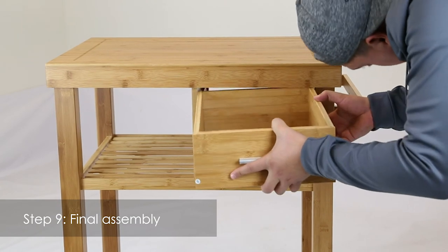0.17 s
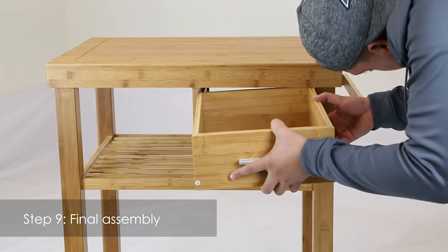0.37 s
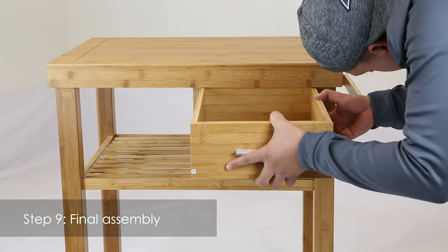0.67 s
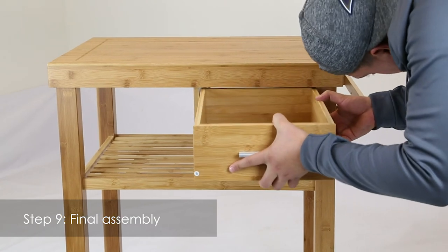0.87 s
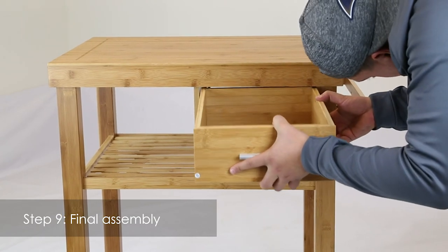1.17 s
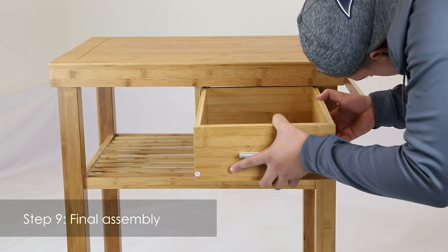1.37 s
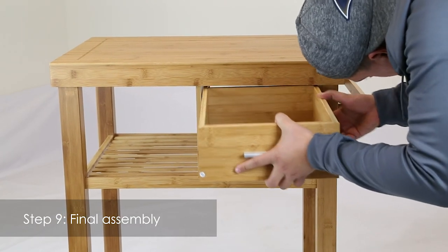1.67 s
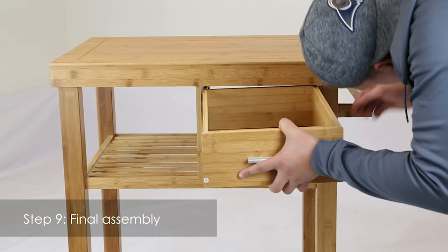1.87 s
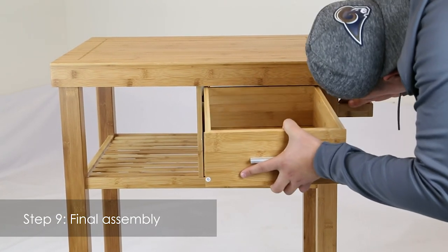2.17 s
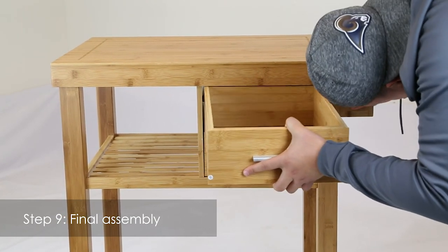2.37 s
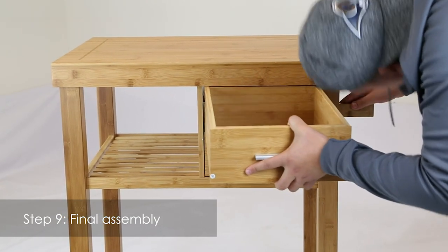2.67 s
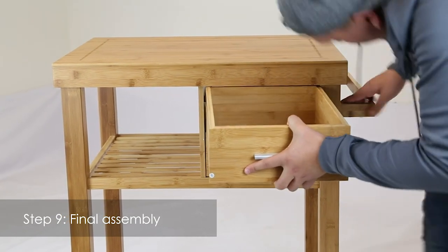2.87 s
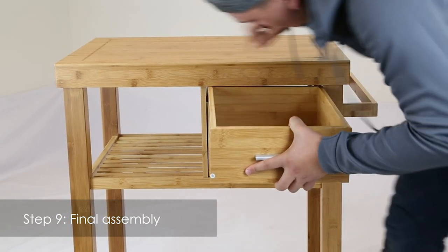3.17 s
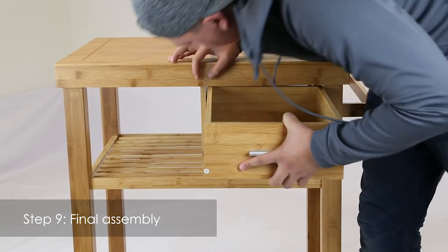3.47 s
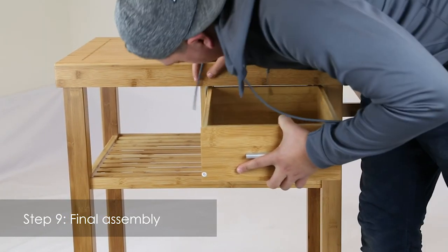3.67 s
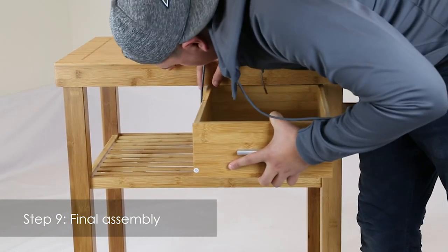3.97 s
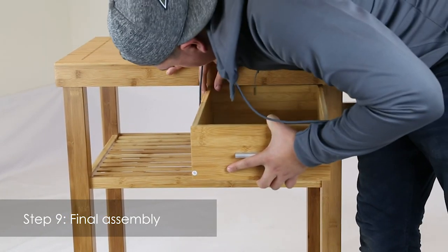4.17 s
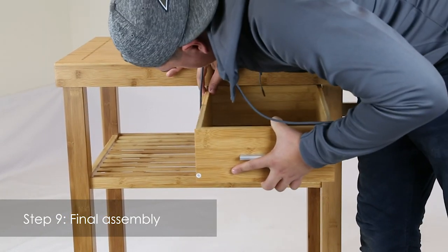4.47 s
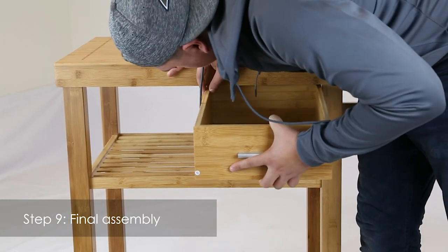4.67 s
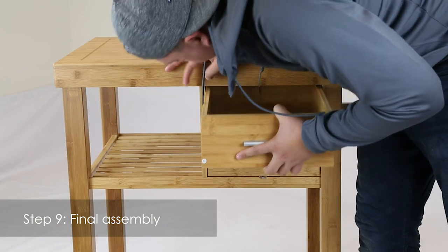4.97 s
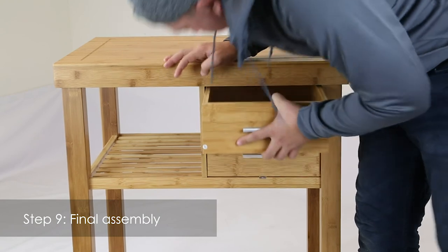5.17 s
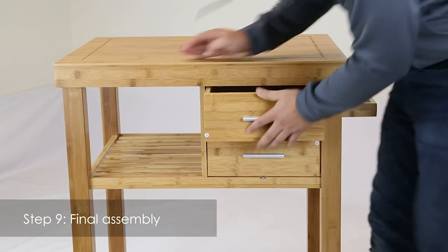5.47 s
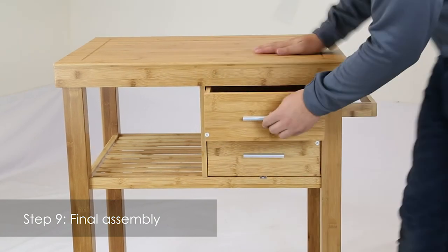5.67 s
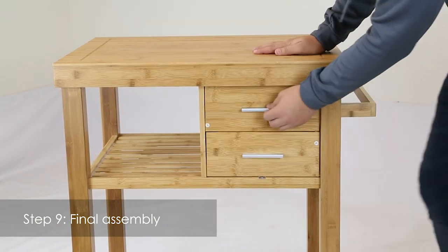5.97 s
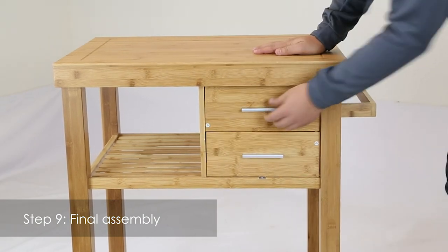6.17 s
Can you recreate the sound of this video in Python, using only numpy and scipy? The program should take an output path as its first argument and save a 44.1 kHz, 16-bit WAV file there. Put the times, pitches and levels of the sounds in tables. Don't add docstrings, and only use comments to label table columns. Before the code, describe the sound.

In a bare, reverberant room, a hollow wooden drawer is worked into a wooden cart. Irregular knocks come first, one strong, then short gritty scrapes with sharp ticks and dull leg thuds on the floor. After a quieter pause of fumbling, longer rough strokes carry it inward until a loud, overloaded slam closes it, followed by a small settling scrape. The microphone is near, with faint low air noise.

```python
import sys
import numpy as np
from scipy import signal
from scipy.fft import rfft, irfft, next_fast_len
from scipy.io import wavfile
from scipy.ndimage import uniform_filter1d

SR = 44100
rng = np.random.default_rng(int(sys.argv[2]) if len(sys.argv) > 2 else 0)


def decibels_to_gain(level_db):
    exponent = np.asarray(level_db, float) / 20
    return 10 ** exponent


def log_audio(samples):
    frames = np.atleast_2d(samples).T
    limited = np.clip(frames, -1, 1)
    pcm = np.round(limited * 32767).astype(np.int16)
    wavfile.write(sys.argv[1], SR, pcm)


N = 279594


def evened(x):
    return x / np.sqrt(np.mean(x ** 2) + 1e-20)


def read(points, hz):
    f, value = np.transpose(points)
    return np.interp(np.log(hz + 1), np.log(f + 1), value)


def add(mix, s, sound):
    part = mix[round(s * SR):][:len(sound)]
    part += sound[:len(part)]


def coloured(x, spectrum):
    gain = decibels_to_gain(read(spectrum, np.fft.rfftfreq(len(x), 1 / SR)))
    return evened(irfft(rfft(x) * gain, len(x)))


def filtered(x, response):
    size = next_fast_len(N + 4096)
    gain = decibels_to_gain(read(response, np.fft.rfftfreq(size, 1 / SR)))
    return irfft(rfft(x, size) * gain, size)[:N]


def causal(gain_db):
    log_gain = np.log(decibels_to_gain(np.maximum(gain_db, -80)))
    full = np.concatenate([log_gain, log_gain[-2:0:-1]])
    click = np.fft.ifft(np.exp(np.conj(signal.hilbert(full)))).real[:1024]
    return click / abs(click).max()


def chatter(t, t60):
    rise_s = 0.005
    shape = decibels_to_gain(-60 * t / t60) * (1 - np.exp(-t / rise_s))
    x = rng.standard_normal(len(t)) * shape
    for _ in range(3):
        z = rfft(x)
        x = irfft(z / abs(z), len(t)) * np.sqrt(shape)
    return x / np.linalg.norm(x)


def ring(modes, t, luck, rise_s, extra_db=0):
    hz, db, t60 = np.transpose(modes)[:, :, None]
    pitch_luck, level_luck = luck[:2 * len(modes)].reshape(2, -1, 1)
    waves = np.sin(2 * np.pi * hz * (1 + 0.0098 * pitch_luck) * t) * np.sign(level_luck)
    decay = decibels_to_gain(db + extra_db + 2.3 * level_luck - 60 * t / t60)
    sound = (decay * waves).sum(0) * (1 - np.exp(-t / rise_s)) ** 2
    return sound / abs(sound).max()


# frequency in Hz, density in dB per Hz.
AIR_SPECTRUM = [(12, -66), (20, -51), (44, -7.5), (66, -7), (95, -16), (167, -7), (192, -9), (284, -5.5),
                (524, -20.5), (586, -17), (693, -20), (2180, -27), (8090, -34), (15800, -38.5)]


def air():
    level_db = -55
    swell_db = 1.5 * evened(uniform_filter1d(rng.standard_normal(N), 6000))
    return decibels_to_gain(level_db + swell_db) * coloured(rng.standard_normal(N), AIR_SPECTRUM)


# frequency in Hz, t60 in seconds.
ROOM_DECAY = [(100, 0.56), (250, 0.51), (600, 0.4), (2000, 0.36), (6000, 0.37), (12000, 0.22)]


def room(x):
    taps = np.zeros((3, SR))
    at = np.arange(200, SR - 20, 20) + rng.integers(0, 20, (3, (SR - 201) // 20))
    np.put_along_axis(taps, at, rng.choice([-1., 1.], at.shape), 1)
    hz, t, z = signal.stft(taps, SR, nperseg=256)
    build = 1 - np.exp(-t / 0.0027)
    decay = decibels_to_gain(-60 * t / read(ROOM_DECAY, hz)[:, None])
    tails = signal.istft(z * build * decay, SR, nperseg=256)[1]
    turn = np.pi * 1.3 * np.arange(N) / SR + np.pi / 3 * np.arange(3)[:, None]
    fed = x * np.cos(turn) * np.sqrt(2 / 3)
    tails = tails[:, :SR * 2 // 3] / np.linalg.norm(tails[0])
    return signal.fftconvolve(fed, tails, axes=1)[:, :N].sum(0)


# start in seconds, level in dB, pitch in Hz.
LEG_THUDS = [
    (1.33, -43, 112.6),
    (1.771, -48, 98.3),
    (2.72, -41, 100),
    (2.963, -37.5, 110),
    (3.071, -29, 161),
    (3.74, -44, 109),
    (4.601, -46.5, 129),
    (5.21, -38.5, 126),
    (5.546, -34, 126),
]


def thuds():
    out, t = np.zeros(N), np.arange(4096) / SR
    rise_s, t60 = 0.01, 0.11
    for s, db, hz in LEG_THUDS:
        modes = [(hz, 0, t60), (hz * 1.475, -6, t60)]
        add(out, s, decibels_to_gain(db) * ring(modes, t, np.ones(4), rise_s))
    return out


# frequency in Hz, level in dB, t60 in seconds.
FRAME_MODES = [(142.4, -11, 0.058), (171, -13.5, 0.083), (192.2, -3, 0.081), (221.6, -4.5, 0.14),
               (239.4, 0.5, 0.052)]
BOX_MODES = [(273.6, 3.5, 0.063), (312.6, 1, 0.053), (329.5, -2, 0.058), (339.7, -4.5, 0.031),
             (357.7, 2.5, 0.037), (411.6, 3.5, 0.05)]
PANEL_MODES = [(486.7, -6, 0.074), (504.3, -2, 0.052), (580.5, -12.5, 0.074), (678.4, -3, 0.031),
               (706.5, -2.5, 0.028), (783.5, -5, 0.029), (914, -7, 0.026)]
# frequency in Hz, density in dB per Hz.
GRIT_SPECTRUM = [(410, -19), (700, -2.5), (1190, -7), (1770, -3.5), (1960, -5), (7610, -26), (11100, -35.5),
                 (15800, -47)]
# time in seconds, speed as grit level in dB.
STROKES = [
    [(1.66, -63.5), (1.784, -50.5), (1.9, -104)],
    [(3.12, -56), (3.162, -55.5), (3.34, -61), (3.36, -53), (3.406, -65.5), (3.6, -60.5)],
    [(4.2, -95), (4.45, -61.5), (4.6, -63), (4.7, -51.5), (4.8, -63)],
    [(4.78, -57), (4.884, -41), (4.96, -41), (5.06, -53), (5.14, -43), (5.222, -42), (5.49, -44),
     (5.545, -44)],
    [(5.6, -49), (5.7, -55), (5.782, -41.5), (5.86, -42.5), (5.95, -39.5)],
    [(6.16, -49.5), (6.294, -61), (6.338, -56)],
]


def slide(rows):
    s, grit_db = np.transpose(rows)
    speed_db = grit_db + 45
    fizz_db = -11.5 + 0.98 * speed_db
    rumble_db = -1 - 0.49 * speed_db
    t = np.arange(s[0], s[-1], 1 / SR)
    slips = rng.standard_normal((2, len(t))) * decibels_to_gain(0.93 * rng.exponential(1, (2, len(t))))
    slips *= rng.random((2, len(t))) < np.array([[20000], [300]]) / SR
    judder_db = 0.53 * evened(uniform_filter1d(rng.standard_normal(len(t)), 700))
    modes = FRAME_MODES + BOX_MODES + PANEL_MODES
    body = ring(modes, np.arange(8192) / SR, rng.standard_normal(64), 0.00037)
    rumble = evened(signal.fftconvolve(slips[1], body)[:len(t)])
    grit = coloured(slips[0], GRIT_SPECTRUM)
    fizz = evened(np.convolve(grit, [-1, 2, -1], "same"))
    sound = grit + decibels_to_gain(np.interp(t, s, fizz_db)) * fizz + decibels_to_gain(np.interp(t, s, rumble_db)) * rumble
    level = decibels_to_gain(np.interp(t, s, grit_db) + judder_db - 1.5)
    return s[0], sound * level * signal.windows.tukey(len(t), .08)


# start in seconds, level in dB, centre in Hz, spread in octaves.
HARD_TICKS = [(0.867, -34.5, 9900, 0.23), (1.6345, -41.5, 1960, 0.38), (2.978, -45, 8900, .8),
              (3.0703, -23.5, 3180, 0.89), (3.08, -30.5, 3900, 0.27), (3.174, -52, 2500, .6),
              (3.303, -42, 6000, 0.67), (3.358, -45, 4050, .6), (3.82, -20.5, 6570, .9),
              (4.955, -37, 4940, 1.2), (5.5034, -42, 10000, 0.37), (5.5557, -15, 3380, 0.95),
              (5.575, -24.5, 3020, 1.1), (5.59, -23, 3000, 1.1), (5.979, -19, 7260, 0.38),
              (0.873, -30, 3740, 0.93)]
# frequency in Hz, level in dB, t60 in seconds.
FITTING_MODES = [(3870, 4, 0.021), (3980, -3, 0.028), (6000, -14, .008), (7100, -7, 0.024),
                 (9100, -12, 0.014)]


def ticks():
    out, t, hz = np.zeros(N), np.arange(2048) / SR, np.fft.rfftfreq(2048, 1 / SR)
    for s, db, centre_hz, spread in HARD_TICKS:
        scuff = decibels_to_gain(0.5) * chatter(t, 0.023) + decibels_to_gain(-4) * (t == 0)
        octaves = np.log2((hz + 20) / centre_hz)
        snap = causal(-24 * np.log10(1 + (octaves / spread) ** 2))
        add(out, s - .0005, decibels_to_gain(db) * signal.fftconvolve(scuff, snap))
    clink_s, clink_db = 3.82, -32
    add(out, clink_s, decibels_to_gain(clink_db) * ring(FITTING_MODES, t, rng.standard_normal(10), 0.00028))
    return out


# frequency in Hz, density in dB per Hz.
EDGE_SPECTRUM = [(600, -41), (900, 2.5), (1170, -2.5), (1290, -6), (1500, 0), (1750, -5), (2000, -15.5),
                 (2250, -13), (2600, -11.5), (3200, -23.5), (4500, -53)]
CRACK_SPECTRUM = [(710, -27), (1200, -5.5), (1280, -6.5), (1640, -10), (1940, -5.5), (2860, -21.5),
                  (3430, -16), (15500, -51.5)]
# time in seconds, box note in Hz, panel note in Hz.
FAVOURED_NOTES = [(0, 346, 673), (.6, 323, 670), (3.0, 347, 747), (4.5, 316, 696), (5.1, 344, 724),
                  (5.18, 379, 598), (5.3, 379, 583), (5.42, 315, 710), (5.95, 333, 669)]
# start in seconds, box level in dB, weight into the frame in dB, hardness in dB.
SOFT_BUMPS = [(0.183, -31.5, -4, -10.5), (0.999, -26.5, -4.5, -9), (1.101, -35.5, -20, -16.5),
              (1.315, -30.5, -4, -21), (1.818, -65, -10, -22), (2.476, -28, 1, -20),
              (2.77, -27.5, -4.5, -15), (2.834, -37.5, -16, -2), (2.86, -33, -7, -5),
              (2.985, -21.5, -10.5, -10), (3.666, -38, -15, -11), (3.773, -31.5, 0, 1.5),
              (3.815, -37, -19.5, 6), (3.862, -24, -14, -20.5), (3.963, -29, -10.5, -11.5),
              (4.14, -42, -7.5, -17), (4.536, -30, -10, -11), (5.214, -22.5, -23, -27),
              (5.42, -26, -11, -7.5), (5.599, -27, -4, -6), (5.807, -24.5, -12, -9.5)]
# start in seconds,
# box level in dB, weight into the frame in dB, hardness in dB, share on the side panels in dB.
CLEAR_KNOCKS = [(0.074, -22.5, -6, -11.5, -5), (0.625, -25.5, -6, -8, -1.5), (0.857, -8, -13, -6, -6.5),
                (1.331, -27.5, -7, -8.5, 0.5), (1.38, -19.5, -13.5, -3.5, 2),
                (1.707, -33.5, -14, -9.5, -17), (1.76, -30, -8, -7.5, -7), (2.174, -26, -7.5, -4.5, 1),
                (2.313, -32, -2, -2, 6.5), (2.41, -22, -10.5, -2, 2.5), (2.665, -24.5, -13, -8, -1.5),
                (2.715, -18.5, -10, -9.5, -2), (2.963, -19.5, -19, -6.5, 1.5), (3.075, -35.5, -5, -3, 0.5),
                (3.252, -29.5, -8, -12.5, -4.5), (3.606, -20.5, -13, -17, -11), (3.737, -14, -13, -7, -4.5),
                (4.496, -26.5, -6.5, -12.5, -5), (4.803, -27.5, -9.5, -13, -7), (4.954, -28, -8.5, -1, -4),
                (5.175, -21.5, -9.5, -7.5, -0.5), (5.284, -19, -25, -8, -11.5),
                (5.552, -28.5, -1.5, 3, 5.5), (5.773, -23.5, -14, -36, -21)]
SLAM_STEPS = [
    (5.9576, -10.5, -12, -5, 2.5),
    (5.9636, -5, -5.5, -1.5, 4),
    (5.981, -6.5, -13, -3, -5),
    (5.999, -11.5, -1, -22, -15),
]


def knocks():
    out, t = np.zeros(N), np.arange(6144) / SR
    hz = np.fft.rfftfreq(2048, 1 / SR)
    box_hz = np.transpose(BOX_MODES)[0][:, None]
    panel_hz = np.transpose(PANEL_MODES)[0][:, None]
    when, box_notes, panel_notes = np.transpose(FAVOURED_NOTES)
    edge = causal(read(EDGE_SPECTRUM, hz))
    click = causal(read(CRACK_SPECTRUM, hz))
    bumps = [(*row, 2.5 + 0.76 * row[-1]) for row in SOFT_BUMPS]
    for s, db, frame_db, hardness_db, panels_db in sorted(CLEAR_KNOCKS + bumps + SLAM_STEPS):
        force_db = db + 22
        crack_db = -18.5 + 1.67 * hardness_db + 0.22 * force_db
        luck = rng.standard_normal((4, 24))
        box_detune_db = -45 * abs(np.log2(box_hz / np.interp(s, when, box_notes)))
        panel_detune_db = -22 * abs(np.log2(panel_hz / np.interp(s, when, panel_notes)))
        box = ring(BOX_MODES, t, luck[0], 0.0042, box_detune_db)
        frame = ring(FRAME_MODES, t, luck[3], 0.0094)
        panels = ring(PANEL_MODES, t, luck[1], 0.0028, panel_detune_db)
        edges = signal.fftconvolve(chatter(t, 0.0362), edge)[:len(t)]
        first_click = decibels_to_gain(-14) * (np.arange(len(t)) == 60)
        crack = signal.fftconvolve(chatter(t, 0.07) + first_click, click)[:len(t)]
        sound = box + decibels_to_gain(frame_db) * frame + decibels_to_gain(panels_db) * panels
        sound = sound + decibels_to_gain(hardness_db + 5) * edges + decibels_to_gain(crack_db + 22) * crack
        add(out, s - .002, decibels_to_gain(db - 1.0) * sound)
    return out


# frequency in Hz, gain in dB.
DIRECT_SHADE = [(100, 1.5), (1000, 0), (3000, -3.5), (8000, -5), (16000, -8)]
# frequency in Hz, gain in dB.
MIC_RESPONSE = [(20, -19), (60, -0.5), (120, -0.5), (9000, 1.5), (15000, -3)]


def scene():
    drawer, snaps = knocks() + thuds(), ticks()
    for rows in STROKES:
        add(drawer, *slide(rows))
    direct = filtered(drawer, DIRECT_SHADE)
    heard = direct + decibels_to_gain(-1.0) * snaps + decibels_to_gain(1.0) * room(drawer + snaps)
    return (filtered(heard, MIC_RESPONSE) + air())[None]


def roll_off(x):
    return signal.sosfilt(signal.butter(12, 16090, fs=SR, output="sos"), x)


def record(dry):
    mix = np.clip(dry, -1, 1)
    return roll_off(mix)


dry = scene()
out = record(dry)
log_audio(out)
```